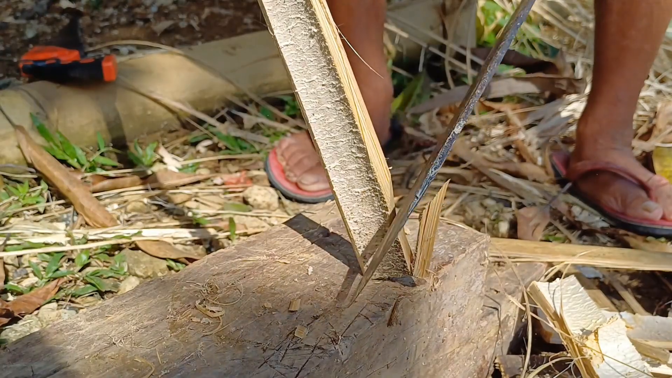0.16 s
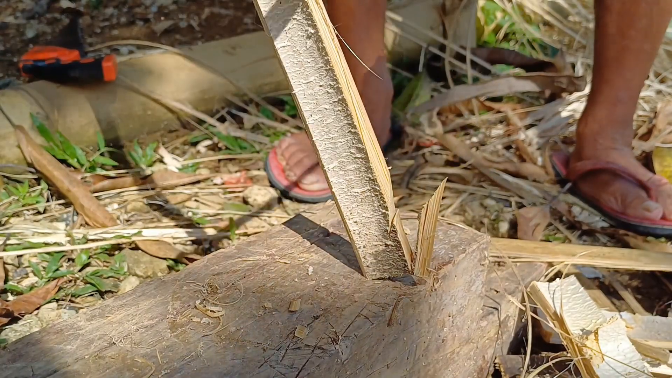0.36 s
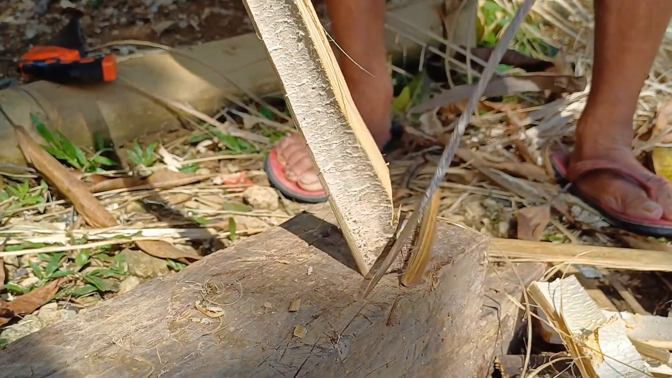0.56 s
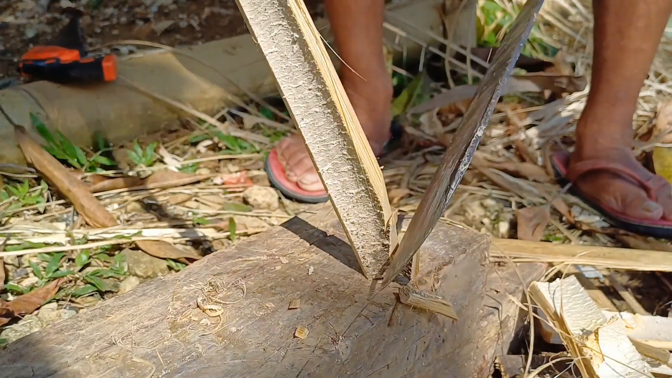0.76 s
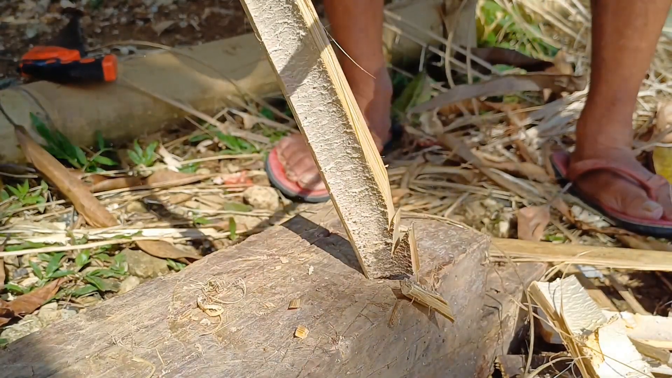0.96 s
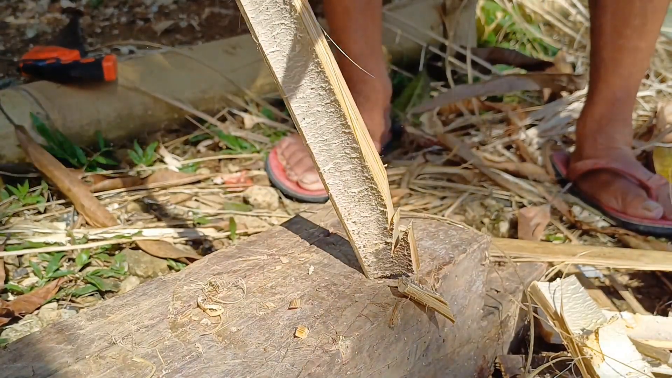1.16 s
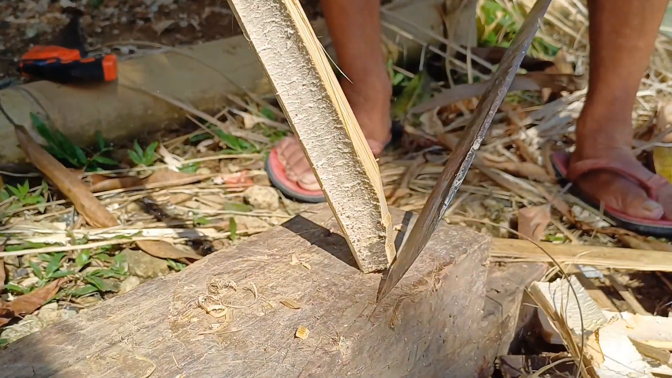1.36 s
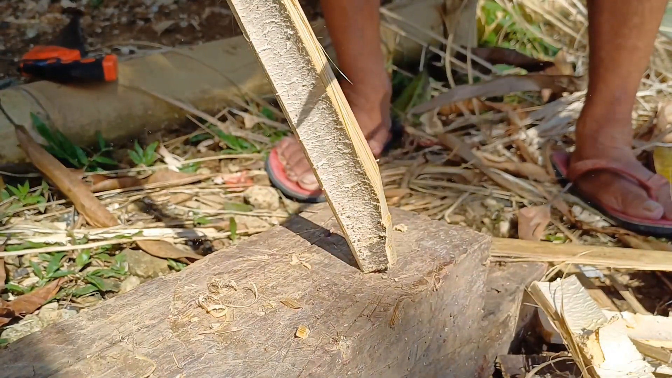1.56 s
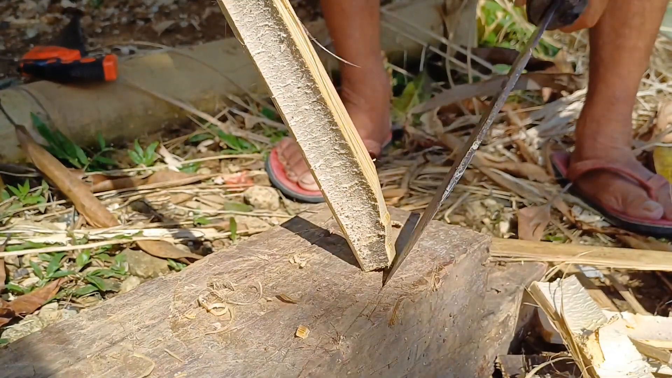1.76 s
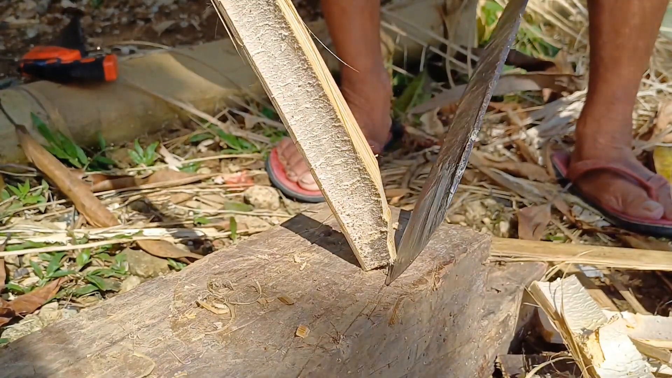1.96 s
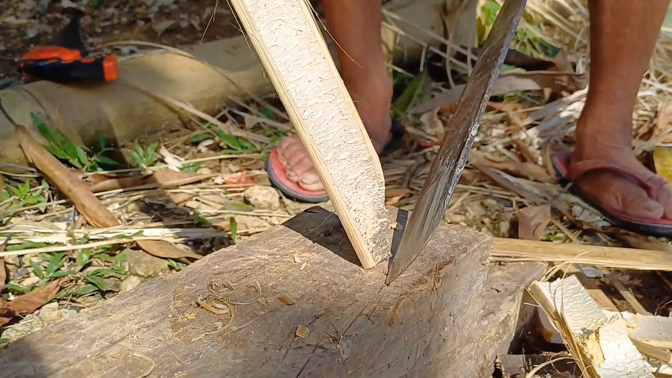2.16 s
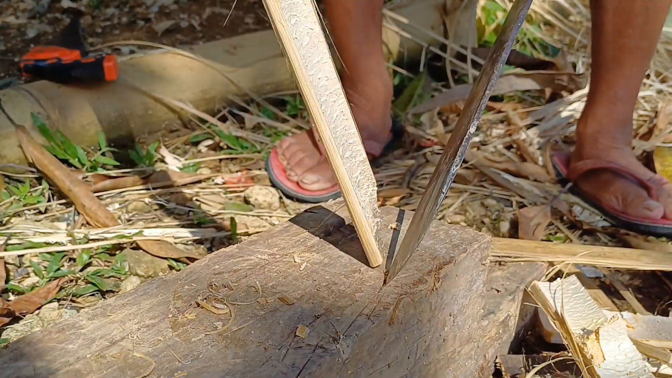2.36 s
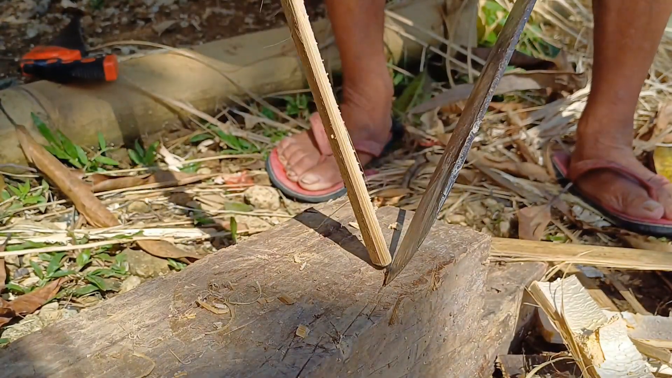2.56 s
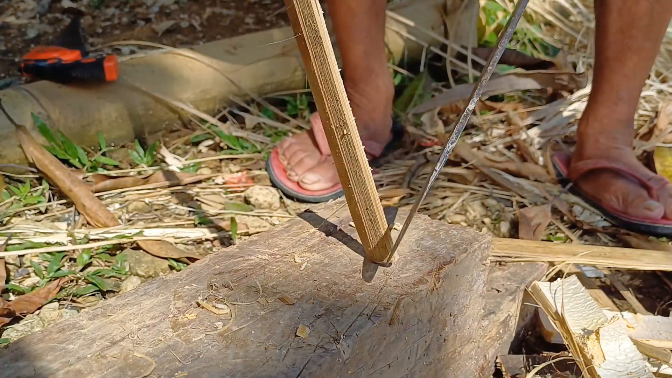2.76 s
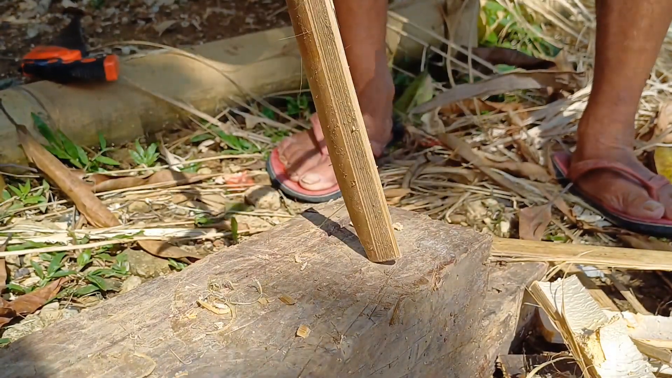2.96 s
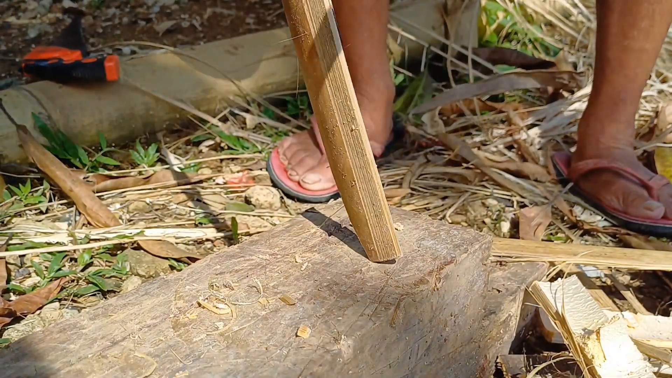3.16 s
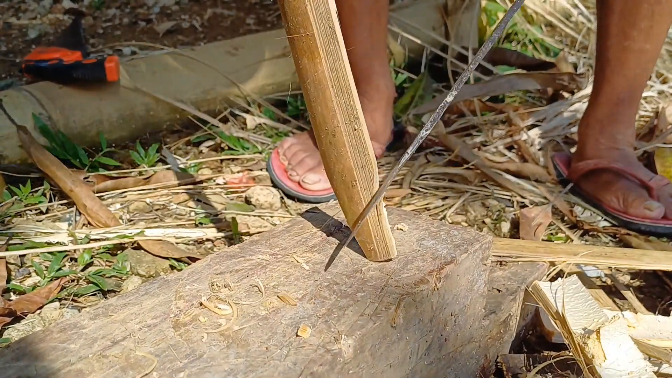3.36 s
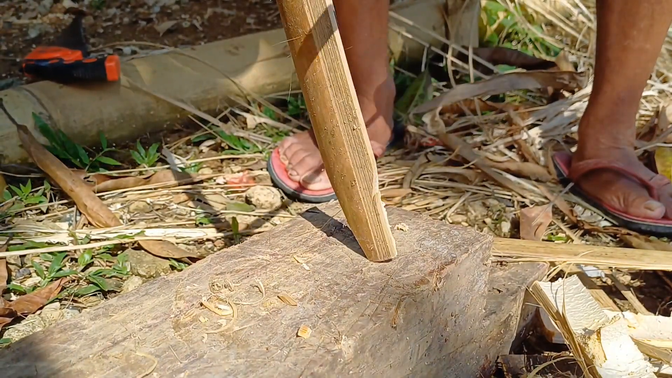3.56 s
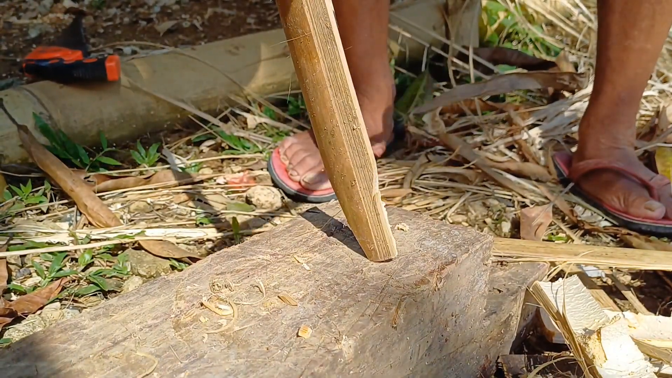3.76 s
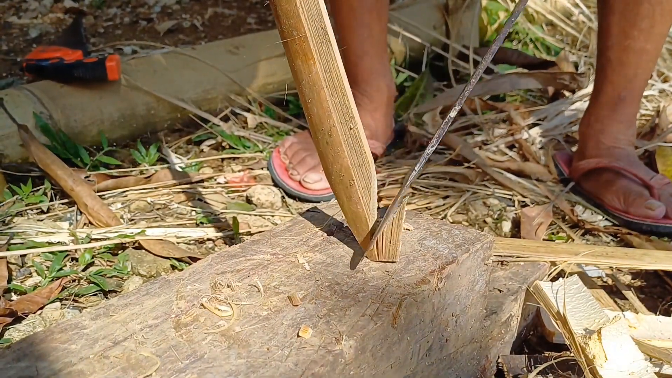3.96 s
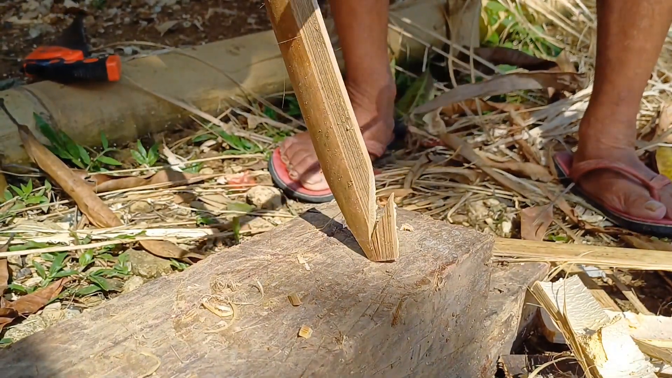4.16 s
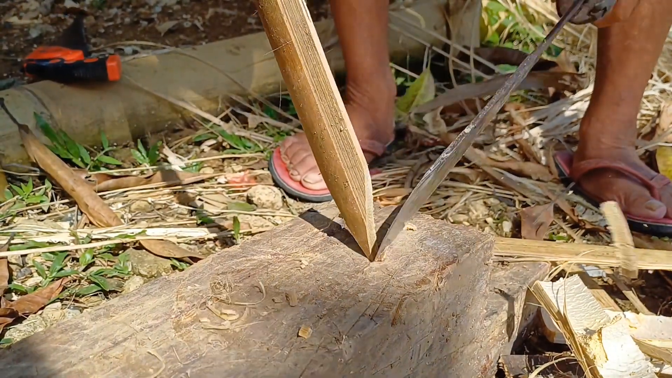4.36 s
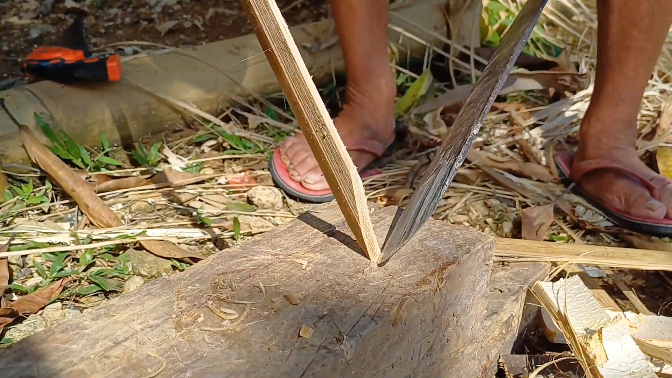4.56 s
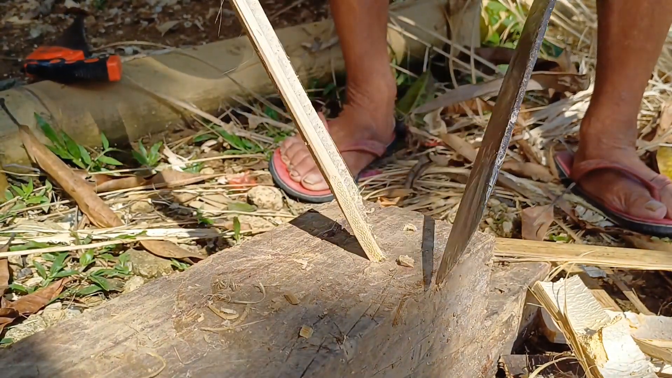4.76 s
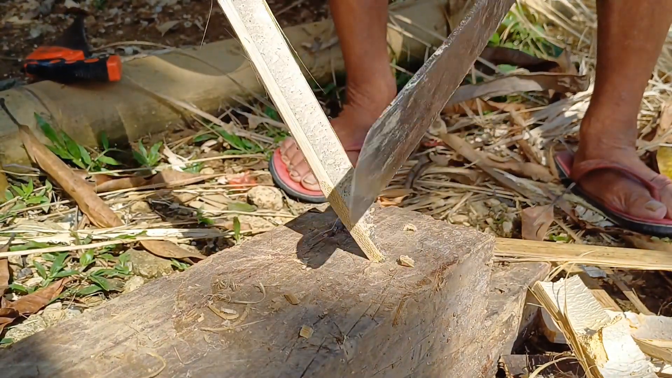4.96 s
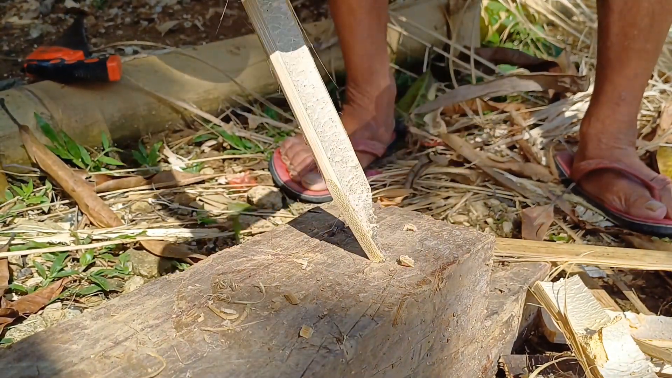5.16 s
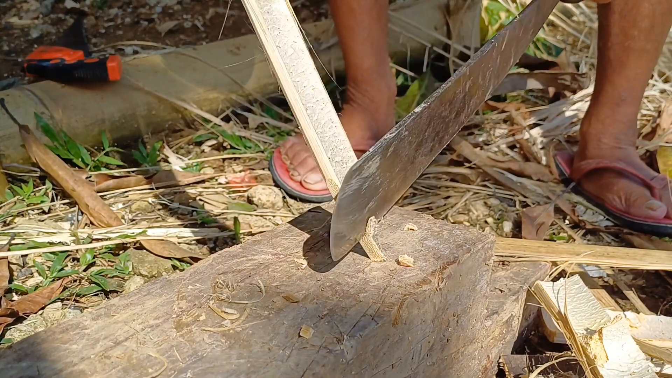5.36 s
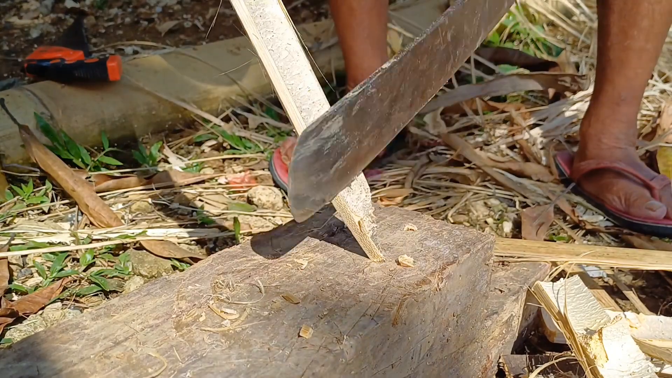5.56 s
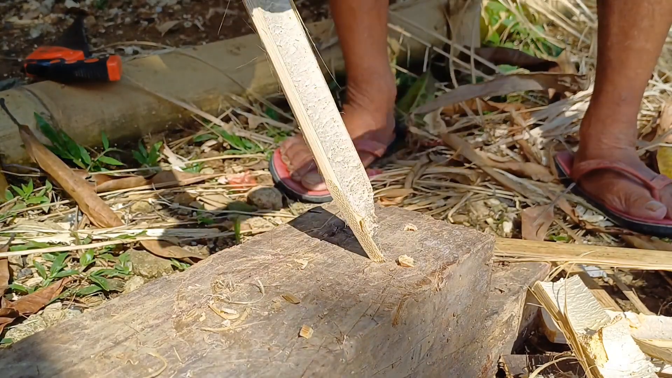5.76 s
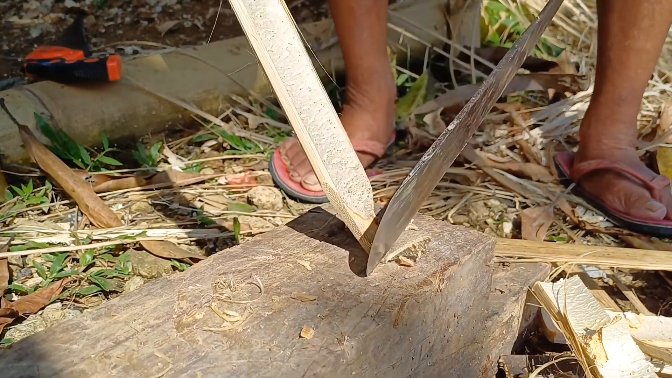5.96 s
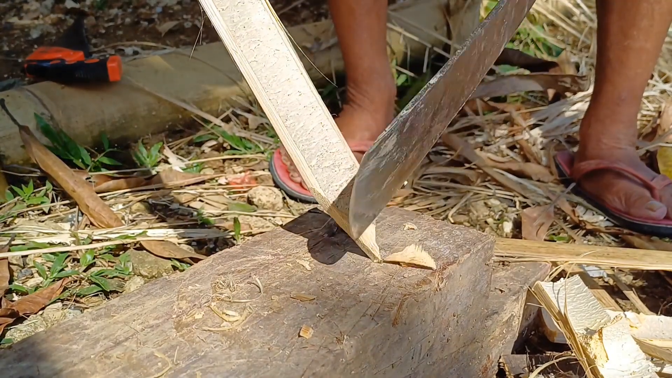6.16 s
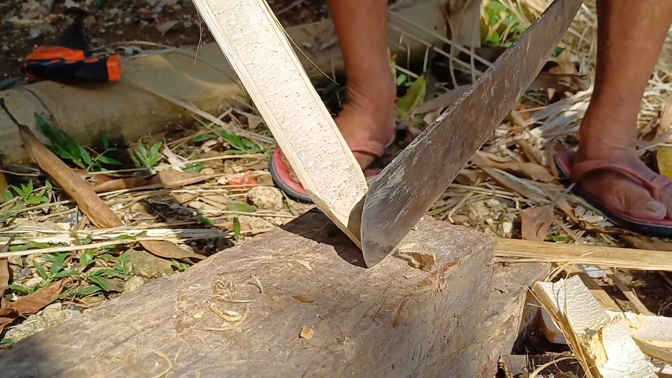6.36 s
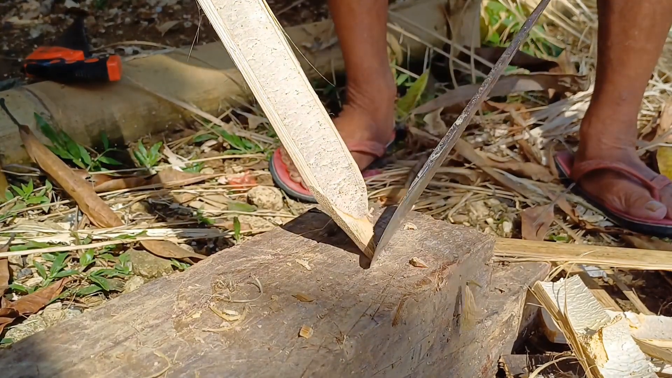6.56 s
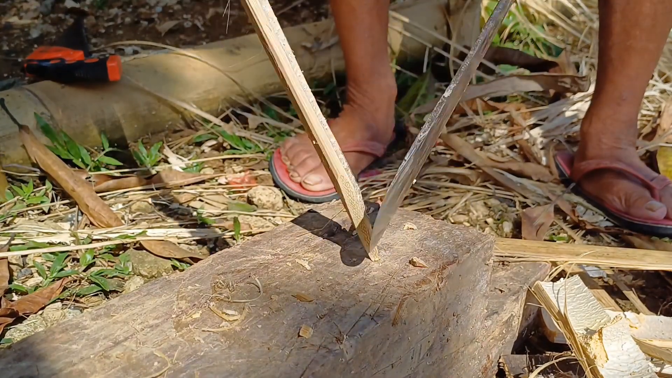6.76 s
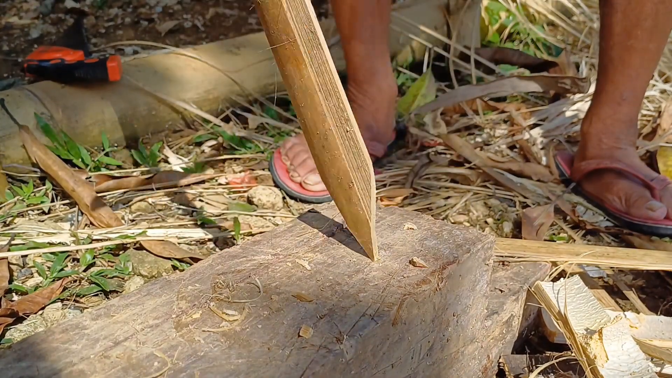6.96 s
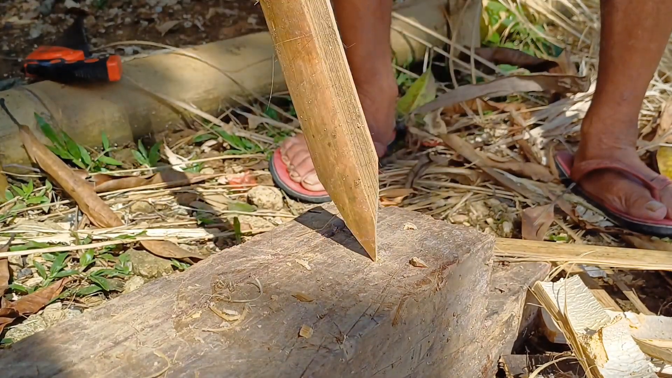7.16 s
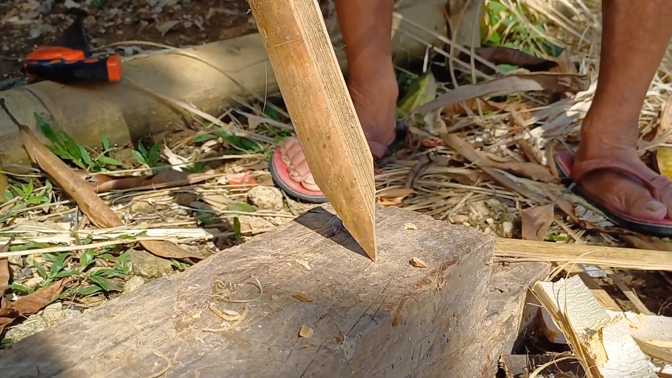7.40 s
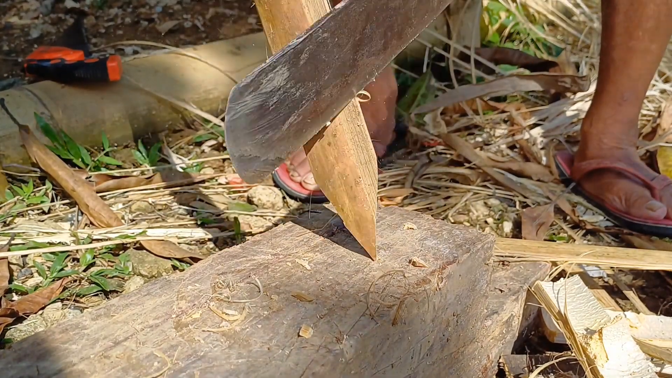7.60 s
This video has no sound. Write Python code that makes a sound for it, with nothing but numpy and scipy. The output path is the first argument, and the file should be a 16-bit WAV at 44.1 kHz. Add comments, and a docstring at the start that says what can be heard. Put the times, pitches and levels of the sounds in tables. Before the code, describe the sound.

Close stereo pickup in an open garden: a machete strikes a bamboo stake on a wooden block about every half second, with some longer gaps. Each hit is a loud dry crack with a short hollow knock, followed by small chips ticking down. A faint engine putters away at the start, birds whistle and peep far off, a nearer bird cheeps later, and a blade stroke rasps along the bamboo near the end.

```python
"""Splitting bamboo with a machete

A machete chops a split bamboo stake on a wooden block in a garden. Each blow is a burst of bright noise for
the cracking fibres plus decaying sines for ringing cane and block. Chips tick down as short noise puffs, the
stake shuffles as grainy noise, and a last stroke shaves the skin with a gritty rasp. Birds whistle as sliding
tones near and far, a small engine putters away as pulses through a pipe, and coloured noise makes the air."""
import sys
import numpy as np
from scipy import signal
from scipy.fft import rfft, irfft, next_fast_len
from scipy.io import wavfile
from scipy.ndimage import uniform_filter1d, map_coordinates

SR = 44100
rng = np.random.default_rng(int(sys.argv[2]) if len(sys.argv) > 2 else 0)


def unload_audio(sound):
    """Save the sound as a 16-bit wav file, at the path given as the first command line argument."""
    columns = np.transpose(np.atleast_2d(sound))
    # keep every value between -1 and 1, then stretch to whole-number steps
    steps = np.round(np.clip(columns, -1, 1) * 32767)
    wavfile.write(sys.argv[1], SR, steps.astype(np.int16))


N = 336483


def amp(db):
    """Gain of a level in dB."""
    return 10 ** (np.asarray(db) / 20)


def unit(x):
    """x at rms 1."""
    return x / np.sqrt(np.mean(x ** 2) + 1e-20)


def along(points, hz):
    """Read a table of (Hz, value) points on a log frequency axis."""
    point_hz, value = np.transpose(points)
    return np.interp(np.log(hz + 1), np.log(point_hz + 1), value)


def curves(rows):
    """One value per sample for each column after the time."""
    s, *columns = np.transpose(rows)
    return [np.interp(np.arange(N) / SR, s, column) for column in columns]


def gate(rows, edge_s):
    """1 while the table lasts, with soft edges."""
    t = np.arange(N) / SR
    return np.clip(np.minimum(t - rows[0][0], rows[-1][0] - t) / edge_s, 0, 1)


def wobble(rate_hz):
    """A smooth random curve through rate_hz random knots a second."""
    knots = rng.standard_normal(int(N * rate_hz / SR) + 4)
    return map_coordinates(knots, [np.arange(N) * rate_hz / SR])


def filtered(x, response):
    """x shaped by a complex response of frequency."""
    n = x.shape[-1]
    padded = next_fast_len(n + 4096)
    return irfft(rfft(x, padded) * response(np.fft.rfftfreq(padded, 1 / SR)), padded)[..., :n]


def resonance(f, centre_hz, width_hz):
    """Response of one damped mode, 1 at its centre."""
    damping = 1j * f * width_hz
    return damping / (centre_hz * centre_hz - f * f + damping)


def progress(length_s):
    """A ramp from 0 towards 1 over an event."""
    return np.arange(round(length_s * SR)) / (length_s * SR)


def add(out, s, x):
    """Mix x into out from time s."""
    part = out[..., round(s * SR):][..., :x.shape[-1]]
    part += x[..., :part.shape[-1]]


# Stereo likeness of noise: hz [Hz], likeness [-1 to 1]
STEREO_LIKENESS = [(60, .85), (130, 0.96), (290, 0.69), (640, 0.49), (1400, -0.3), (3100, -0.19),
                   (7000, -0.31), (15000, 0.81)]


def pair(two, spectrum, tilt_db=0):
    """Two noises coloured and mixed to left and right: most alike in the bass and at the very top."""
    turn = lambda hz: np.arccos(np.clip(along(STEREO_LIKENESS, hz), -1, 1)) / 2
    # the tilt is in dB per octave, pivoting at 5 kHz
    gain = lambda hz: amp(along(spectrum, hz) + tilt_db * np.log2(hz / 5000 + 1e-3))
    mid, side = filtered(two, lambda hz: gain(hz) * [np.cos(turn(hz)), np.sin(turn(hz))])
    return np.array([mid + side, mid - side])


def rush(spectrum, patchy_db):
    """Stereo noise of rms 1 with patches of random gain in time and frequency."""
    bins = signal.stft(rng.standard_normal((2, N)), nperseg=512)[2]
    field = uniform_filter1d(rng.standard_normal(bins.shape[1:]), size=6, axis=0)
    field = uniform_filter1d(field, size=10, axis=1)
    patchy = signal.istft(bins * amp(patchy_db * unit(field)), nperseg=512)[1][:, :N]
    return unit(pair(patchy, spectrum))


# Garden decay before any stretch: hz [Hz], t60_s [s]
GARDEN_DECAY = [(100, 0.51), (500, 0.12), (2000, 0.14), (6000, 0.14), (15000, 0.045)]


def echoes(x, longer=1):
    """The garden's answer: each frequency dies at its own speed, differently on each side."""
    hz, t, bins = signal.stft(rng.standard_normal((2, SR // 2)), SR, nperseg=256)
    t60_s = longer * along(GARDEN_DECAY, hz)[:, None]
    tail = signal.istft(bins * amp(-60 * t / t60_s), SR, nperseg=256)[1]
    return signal.fftconvolve(np.atleast_2d(x), tail / np.linalg.norm(tail[0]), axes=1)


# Slow level moves of the air: start_s [s], rumble_db [dB], wind_db [dB]
AIR_LEVELS = [(0.0, -58.5, -59.5), (0.55, -52.5, -60), (0.74, -55.5, -59), (1.08, -60, -63),
              (1.59, -60, -67), (1.89, -55, -60), (2.08, -55.5, -62.5), (2.59, -60, -63), (2.83, -57, -61),
              (3.91, -54, -58.5), (4.14, -60, -58.5), (4.57, -53, -60.5), (5.63, -51.5, -56.5),
              (5.74, -46.5, -48), (5.95, -50, -56), (7.01, -53.5, -61), (7.46, -48, -54), (7.63, -52, -59)]
# Relative colours of rumble, wind and leaf hiss: hz [Hz], density_db [dB per Hz]
RUMBLE_COLOUR = [(12, -52), (20, -12), (91, -11), (118, 0.5), (231, -11), (259, -29), (300, -15),
                 (390, -27), (660, -120)]
BREEZE_COLOUR = [(88, -23), (150, -2), (364, -7), (409, -8.5), (892, -30.5), (1030, -39), (1500, -33.5),
                 (1950, -69), (3300, -120)]
LEAF_COLOUR = [(600, -38.5), (900, -12), (1300, -17.5), (2200, -10), (3300, -13.5), (4400, -11),
               (7200, -11), (8000, -16.5), (9500, -29.5), (12000, -61)]
LEAVES_DB, TOP_HISS_DB = -69.5, -78


def air():
    """Far rumble, lumpy wind that brightens in gusts, and the nearly steady hiss of leaves."""
    rumble_db, wind_db = curves(AIR_LEVELS)
    rumble = amp(rumble_db + 3.3 * wobble(14)) * rush(RUMBLE_COLOUR, patchy_db=2.0)
    lumps_db = 2.4 * wobble(16)
    wind = amp(wind_db + lumps_db) * rush(BREEZE_COLOUR, patchy_db=0.0)
    # the brighter layer gains 1.1 dB per dB of wind
    gust_colour = [(400, -26.5), (650, 1.0), (1500, -13.0), (2400, -23.5)]
    gusts = amp(1.1 * (wind_db + 48.5) - 64.5 + lumps_db) * rush(gust_colour, patchy_db=1.0)
    top_colour = [(6500, -25.0), (8200, -6), (11400, 1.5), (11900, -4.0), (16500, -10)]
    top = amp(TOP_HISS_DB) * rush(top_colour, patchy_db=1.2)
    leaves = amp(LEAVES_DB + 0.33 * wobble(4.1)) * rush(LEAF_COLOUR, patchy_db=3.4)
    return rumble + wind + gusts + top + leaves


# Engine run, level before echo and panning: start_s [s], firing_rate_hz [firings per s], level_db [dB]
ENGINE_RUN = [(0, 31.7, -58), (.2, 31.7, -56.5), (.5, 31.7, -55), (.9, 31.5, -57), (1.2, 31, -58.5),
              (1.7, 30, -68)]
# Exhaust pipe resonances: centre_hz [Hz], width_hz [Hz], gain_db [dB]
EXHAUST_PIPE = [(140, 43, 0), (227, 23, 2.5), (340, 80, -0.5), (427, 96, -3.5), (780, 120, -23)]


def engine():
    """One puff per firing excites the exhaust pipe's resonances."""
    rate_hz, level_db = curves(ENGINE_RUN)
    cycles = np.cumsum(rate_hz) / SR + .22
    fired = np.diff(np.floor(cycles), prepend=0) * amp(1.5 * wobble(30))

    def pipe(f):
        modes = enumerate(EXHAUST_PIPE)
        body = sum((-1) ** k * amp(db) * resonance(f, centre, width) for k, (centre, width, db) in modes)
        return body / (1 + 1j * f / 500) ** 2  # two gentle lowpasses at 500 Hz

    puffs = amp(level_db) * gate(ENGINE_RUN, .01) * unit(filtered(fired, pipe))
    return puffs + amp(-8) * echoes(puffs)[:, :N]


# Far whistles and coos, level before the mix: start_s [s], length_s [s], from_hz [Hz], to_hz [Hz], level_db [dB]
FAR_WHISTLES = [(1.905, 0.1126, 536, 421, -68.5), (2.546, .38, 2688, 1492, -68.5),
                (2.765, .16, 3720, 4000, -85), (2.99, 0.073, 2610, 2490, -74.5),
                (2.995, 0.095, 3640, 3270, -81), (3.56, .22, 2025, 1597, -78), (4.02, .17, 2410, 2820, -76),
                (5.16, 0.12, 1440, 900, -71), (5.994, 0.1, 905, 1157, -73), (6.06, 0.089, 1390, 2205, -79),
                (6.09, .12, 906, 1227, -74), (6.455, 0.084, 970, 1067, -74), (6.58, 0.062, 1220, 1154, -79),
                (6.698, 0.044, 924, 860, -70.5), (7.032, 0.0576, 890, 848, -73),
                (7.5, 0.13, 2100, 1543, -70)]
# One far bird's repeated note, level before the mix: start_s [s], level_db [dB]
REPEATED_PEEPS = [(0.072, -80), (0.275, -77.5), (0.496, -72.5), (0.736, -75.5), (0.984, -77.5),
                  (2.354, -85), (2.536, -74.5), (2.804, -78.5), (3.031, -74), (3.259, -72.5), (3.493, -74),
                  (4.095, -83.5), (6.147, -74.5), (6.436, -78), (6.686, -74.5), (6.951, -89)]
PEEP_S, PEEP_FROM_HZ, PEEP_TO_HZ = 0.13, 2940, 2640


def far_birds():
    """Sliding sine whistles with a slight quaver in pitch, heard mostly as echo."""
    whistles = np.zeros(N)
    quaver = 1 + .009 * wobble(150)
    peeps = [(s, PEEP_S, PEEP_FROM_HZ, PEEP_TO_HZ, db) for s, db in REPEATED_PEEPS]
    for s, length_s, from_hz, to_hz, level_db in list(FAR_WHISTLES) + peeps:
        u = progress(length_s)
        glide_hz = from_hz * (to_hz / from_hz) ** (1 - (1 - u) ** 1.1)
        hz = glide_hz * np.roll(quaver, -round(s * SR))[:len(u)]
        tone = np.sin(2 * np.pi * np.cumsum(hz) / SR)
        add(whistles, s, amp(level_db) * np.sin(np.pi * u) ** .5 * tone)
    brightened = filtered(whistles, lambda hz: amp(along([(900, -5.5), (2500, -0.5)], hz)))
    return amp(1.5) * whistles + amp(11) * echoes(brightened, longer=4.3)[:, :N]


# Hoarse far chatter: start_s [s], length_s [s], level_db [dB before the fade]
HOARSE_CHATTER = [(2.76, 0.21, -66), (2.974, 0.21, -65.5), (3.944, 0.28, -57.5)]


def hoarse_bird():
    """Bursts of mid-treble noise that start quickly and fade."""
    swell = np.zeros(N)
    for s, length_s, level_db in HOARSE_CHATTER:
        u = progress(length_s)
        add(swell, s, amp(level_db) * np.minimum(u / .12, 1) * (1 - u) ** .6)
    return swell * rush([(1400, -18), (2000, -10.5), (2700, -5), (3900, -12), (4500, -36)], patchy_db=4.5)


# Near cheeps: start_s [s], steady_s [s], from_hz [Hz], level_db [dB before the mix], halfway_share [0-1]
NEAR_CHEEPS = [(4.732, 0.035, 1580, -55.5, 0.04), (4.913, 0.015, 1661, -50, .22),
               (5.097, 0.016, 1660, -48, 0.27), (5.312, 0.015, 1672, -49, 0.7),
               (5.507, .02, 1651, -46, 0.7), (5.719, .025, 1599, -47, 0.7)]
# The bird's throat colour: hz [Hz], gain_db [dB]
THROAT_COLOUR = [(1500, -9), (2250, -40), (2650, -1), (3100, 0), (3900, -4), (4800, -9), (5600, -28),
                 (6500, -7), (7300, -11), (8000, -19), (10000, -36)]
FALL_S, FALL_TO_HZ = 0.069, 1324  # each cheep ends in a slide to this pitch


def near_bird():
    """Stacks of partials that soon split, as lines halfway between the harmonics fade in."""
    near = np.zeros(N)
    rough = 1 + .006 * wobble(200)
    for s, steady_s, from_hz, level_db, halfway_share in NEAR_CHEEPS:
        length_s = steady_s + FALL_S
        t = np.arange(round(length_s * SR)) / SR
        hz = np.interp(t, [steady_s, length_s], [from_hz, FALL_TO_HZ]) * rough[round(s * SR):][:len(t)]
        halfway = np.clip(halfway_share, 0, 1) * np.clip((t - .022) / 0.013, 0, 1)
        half_phase = np.pi * np.cumsum(hz) / SR
        stack = np.zeros(len(t))
        for k in range(2, 13):  # odd k are the halfway lines
            share = halfway if k % 2 else 1
            stack += share * amp(along(THROAT_COLOUR, hz * k / 2)) * np.sin(k * half_phase)
        envelope = np.clip(np.minimum(t / 0.018, (length_s - t) / 0.056), 0, 1)
        add(near, s, amp(level_db) * envelope * stack)
    foliage = [(1500, -9), (2800, 1.5), (4500, -8), (8000, -7.5)]  # foliage returns the middle best
    dulled = filtered(near, lambda hz: amp(along(foliage, hz)))
    return near * amp([[-5.5], [-3.5]]) + amp(9.5) * echoes(dulled, longer=2.9)[:, :N]


# Stake shuffled on the block: start_s [s], length_s [s], level_db [dB before the fade], top_hz [Hz]
STAKE_SHUFFLES = [(1.893, 0.18, -53, 798), (2.773, 0.2, -58.5, 878), (3.621, 0.13, -52.5, 1500),
                  (3.939, .16, -52.5, 698), (5.607, 0.34, -55, 780)]


def shuffles():
    """A dull, grainy rustle that starts quickly and fades."""
    out = np.zeros((2, N))
    for s, length_s, level_db, top_hz in STAKE_SHUFFLES:
        u = progress(length_s)
        grains = rng.standard_normal((2, len(u))) * amp(2.0 * wobble(170)[:len(u)])
        colour = [(150, -20), (330, 0), (top_hz * 0.73, -6), (top_hz, -12), (top_hz * 2.0, -35), (6000, -90)]
        envelope = np.minimum(u / 0.11, 1) * (1 - u) ** .8
        add(out, s, amp(level_db) * envelope * unit(pair(grains, colour)))
    return out


# Chips landing: start_s [s], tick_peak_db [dB before panning], pitch_hz [Hz], tap_db [dB relative to the tick]
CHIP_LANDINGS = [(0.7628, -56, 5600, 13.5), (1.265, -31, 7420, -15), (1.279, -32, 5300, -26),
                 (1.3518, -30, 4160, -22), (1.3727, -37, 4300, -13), (1.3953, -38, 6750, -4),
                 (1.404, -39, 5950, -19), (1.4311, -40, 11540, -7), (1.4517, -44.5, 6480, -24),
                 (1.4735, -36, 3950, -9), (1.616, -47, 6100, -26), (1.8713, -38, 11130, 0),
                 (1.9028, -38, 7400, -15), (1.914, -47.5, 6670, 3), (2.1036, -47, 6840, -30),
                 (2.354, -46, 9670, -33.5), (2.3844, -49, 6720, -14.5), (3.3069, -39, 4540, 5.5),
                 (3.3725, -35, 6570, -2), (3.4458, -36, 6850, -3.5), (3.479, -50, 11050, -30),
                 (3.512, -46.5, 5235, -3.5), (4.488, -35.5, 6030, -33), (4.5246, -31, 12500, -11.5),
                 (6.0307, -49, 5070, -8), (6.14, -55, 7000, 8), (6.6114, -45.5, 7380, -21)]
CHIP_T60_S = 0.015
CRUMB_DB, CRUMB_HZ, CRUMB_TAP_DB = -55.5, 5500, -10.5  # centres of level and pitch; tap relative to tick


def chips():
    """Each chip or crumb gives a short dry tick around its pitch, with a duller tap under it."""
    out, t = np.zeros((2, N)), np.arange(SR // 20) / SR
    landings = list(CHIP_LANDINGS)
    for when, size, pitch in rng.random((2 * N // SR, 3)):  # crumbs scattered at random, about two a second
        crumb_db, crumb_hz = CRUMB_DB + 6 * (size - .5), CRUMB_HZ * (.7 + .6 * pitch)
        landings.append((when * N / SR, crumb_db, crumb_hz, CRUMB_TAP_DB))
    for s, tick_db, hz, tap_db in landings:
        puffs = rng.standard_normal((2, 2, len(t))) * amp(-60 * t / CHIP_T60_S)
        tick = pair(puffs[0], [(1500, -30), (hz * 0.5, -9), (hz, 0), (hz * 1.3, -8), (21000, -16)])
        tap = pair(puffs[1], [(500, -30.5), (900, 8.5), (2600, 13.5), (4000, 4)])
        both = amp(tick_db) * (tick / abs(tick).max() + amp(tap_db) * tap / abs(tap).max())
        add(out, s, both * amp([[-1], [1]]))  # slightly to the right
        add(out, s + 0.0027, amp(-7.0) * echoes(both))
    return out


# Touch, bite, push, blade off, peel trailing away: start_s [s], rasp_db [dB before grit]
SHAVE_STROKE = [(7.222, -70), (7.228, -39.5), (7.265, -41.5), (7.271, -31), (7.34, -28), (7.396, -23),
                (7.412, -26), (7.424, -39), (7.49, -42), (7.565, -58), (7.63, -69)]
# Relative colour of the scraped skin: hz [Hz], density_db [dB per Hz]
SKIN_COLOUR = [(880, -38), (1500, -19), (1970, -40), (2130, -13.5), (3550, -9.5), (5750, -0.5), (8260, -8),
               (14300, -8.5), (16000, -22), (16500, -25)]
# Bands in which the steel sings along: centre_hz [Hz], width_hz [Hz], unused_db [dB, not played]
BLADE_BANDS = [(5570, 75, 0), (7300, 41, -1), (7560, 160, -1), (8800, 67, -2), (11300, 46, -1),
               (12500, 36, -2), (12900, 110, -3), (14400, 50, 0)]
# Modes of cane and block, also rung by the chops: pitch_hz [Hz], level_db [dB, relative], t60_s [s, nominal]
WOOD_MODES = [(67.3, -5, 0.25), (109.5, 5, 0.076), (178, 0, 0.053), (288, 1, 0.028), (395, -2, 0.036),
              (590, -1, 0.03), (765, -7, 0.031), (1002, -9.5, 0.025), (1206, 1, 0.014), (1487, -0.5, 0.028),
              (1733, -2.5, 0.036), (2220, -17, 0.011)]
SING_DB = 3.5  # lift at the centre of each blade band, more where bands overlap
SHAKE_DB, SHAKE_GROWS = -47, 0.41  # cane level at a rasp of -27 dB; dB per dB of rasp
SQUEAK_S, SQUEAK_HALF_S, SQUEAK_HZ, SQUEAK_DB = 7.345, 0.02, 1410, -41.5


def shave():
    """The blade rasps along the skin: gritty, patchy noise, part of it shaking the cane's modes."""
    rasp_db, = curves(SHAVE_STROKE)
    grit = amp(1.8 * wobble(700) + 1.3 * wobble(70))
    cane = lambda f: sum(amp(db) * resonance(f, centre, 150) for centre, db, _ in WOOD_MODES[3:])
    wood = unit(filtered(pair(rng.standard_normal((2, N)), [(100, 0)]), cane))
    shaken = amp(SHAKE_DB + SHAKE_GROWS * (rasp_db + 27)) * wood
    t = np.arange(N) / SR
    slip = np.sin(2 * np.pi * np.cumsum(SQUEAK_HZ + 60 * wobble(60)) / SR)  # a brief stick-slip
    squeak = amp(SQUEAK_DB) * np.exp(-((t - SQUEAK_S) / SQUEAK_HALF_S) ** 2) * slip
    steel = lambda f: amp(SING_DB * sum(1 / (1 + (2 * (f - c) / w) ** 2) for c, w, _ in BLADE_BANDS))
    rasp = unit(filtered(rush(SKIN_COLOUR, patchy_db=4), steel))
    return squeak + gate(SHAVE_STROKE, .002) * grit * (amp(rasp_db) * rasp + shaken)


# Blows, levels before panning: start_s [s], crack_db, thump_db, block_db, cane_db, cane_top_db [dB], cut_ms [ms],
# land_ms [ms until the blade lands], crack_t60_ms [ms], tilt_db [dB per octave],
# ring_freedom [factor on wood decay above 900 Hz]
CHOP_BLOWS = [(0.5502, -6.5, -26, -17.5, -22, -24, 3.9, 3.37, 21.6, 4, 1.57),
              (1.1773, -8.5, -21.5, -11, -7.5, -30.5, 6.1, 9.15, 18, 2, 1.38),
              (1.2064, -51.5, -43.5, -31, -36, -49, 2.8, 1.5, 18, -0.9, 1.1),
              (1.7332, -13.5, -23.5, -14, -9.5, -28, 5, 5.3, 19.7, -0.5, 2.8),
              (1.761, -44, -49.5, -25.5, -22, -44, 2.5, 2, 16, -6, 1.6),
              (3.1866, -15, -27.5, -27.5, -20.5, -23, 3.86, 4.47, 41, 2, 1.25),
              (3.622, -64.5, -46.5, -43, -59.5, -58.5, 2.4, 4.2, 40, -1, 0.56),
              (3.8014, -11.5, -31, -19.5, -25, -30, 8.8, 5.05, 12.6, 3.5, 0.62),
              (4.3153, -11, -24.5, -13, -9.5, -13, 8.8, 7.04, 9.1, 3, 1.2),
              (4.344, -54, -47, -30.5, -41.5, -43.5, 2.7, 1.5, 20, 0.5, 0.88),
              (5.2924, -12, -34.5, -38.5, -35, -31, 4.1, 6.3, 27.7, 4.5, 0.64),
              (5.8284, -11, -30, -12.5, -6.5, -16, 3.5, 10.2, 46, 2.5, 1),
              (6.3333, -18.5, -31.5, -22.5, -16, -30, 7.3, 4.3, 28, -0.9, 1.26),
              (7.396, -25.5, -39.5, -37.5, -51, -30.5, 2.6, 4.04, 150, 2.54, .8)]
# Relative colour of cracking fibres: hz [Hz], density_db [dB per Hz]
FIBRE_COLOUR = [(150, -33), (250, 0.5), (454, 3.5), (809, -3), (1190, -1), (1840, -12.5), (2160, -6),
                (3230, -10.5), (6520, -10.5), (8930, -17.5), (14900, -17.5), (16500, -22)]
# Stereo lean of a blow: hz [Hz], left_minus_right_db [dB]
BLOW_LEAN = [(60, -4.5), (200, -2), (400, -4.5), (700, -4.5), (1300, 2), (4400, 1), (15000, -3)]
RING_RISE_S = 0.00055  # time constant of the wood's onset
UNEVEN_DB = 2.5  # spread of each blow's own colour
ECHO_DB, SPLIT_DB = -13.5, -32.5  # walls under a blow; the running split under the crack


def wood_ring(t, levels_db, land_ms, freedom):
    """Decaying sines for block and cane, struck weakly at first contact and fully at the landing."""
    ring = np.zeros(len(t))
    for hz, mode_db, t60_s in WOOD_MODES:
        level_db = levels_db[np.searchsorted([200, 900, 1350], hz)]  # thump, block, cane, cane top
        t60_s = t60_s * freedom if hz > 900 else t60_s
        for start_ms, share_db in ((0, -15), (land_ms, 0)):
            u = np.maximum(t * 1000 - start_ms, 0) / 1000
            swing = np.sin(2 * np.pi * hz * (1 + rng.normal(0, .012)) * u)
            decay_db = level_db + mode_db + share_db + rng.normal(0, 1.4) - 60 * u / t60_s
            ring += rng.choice([-1, 1]) * amp(decay_db) * swing * (1 - np.exp(-u / RING_RISE_S))
    return ring


def lean(hz):
    """Level lean by frequency, with the left 0.1 ms ahead of the right."""
    early = np.exp(2j * np.pi * hz * 5e-5 * np.array([[1], [-1]]))
    return amp(along(BLOW_LEAN, hz) * [[.5], [-.5]]) * early


def chops():
    """The crackle swells while the blade cuts; when it lands, block and cane ring."""
    out, t = np.zeros((2, N)), np.arange(SR // 4) / SR
    ms = t * 1000
    split_colour = [(700, -31), (1500, -7.0), (3200, -6.0), (5500, -3.0), (7500, -7.5), (16500, -9.5)]
    for s, crack_db, *levels_db, cut_ms, land_ms, t60_ms, tilt_db, freedom in CHOP_BLOWS:
        swell = np.minimum(ms / cut_ms, 1)
        shape = swell ** 1.3 * amp(-60 * np.maximum(ms - cut_ms, 0) / t60_ms)
        bursts = amp(3.6 * rng.standard_normal(len(t) // 16 + 1)).repeat(16)[:len(t)]  # fibres break in bursts
        snaps = rng.standard_normal((2, len(t))) * bursts
        bumps = np.c_[np.geomspace(1500, 17000, 40), UNEVEN_DB * rng.standard_normal(40)]
        fibres = filtered(pair(snaps, FIBRE_COLOUR, tilt_db), lambda hz: amp(along(bumps, hz)))
        crack = amp(crack_db) * shape * unit(fibres)
        ring = wood_ring(t, levels_db, land_ms, freedom)
        add(out, s, filtered(crack + ring, lean))
        split = unit(pair(snaps[:, ::-1], split_colour))
        fading = amp(-120 * t) / (1 + np.exp((ms - 95) / 8))  # the split runs on along the grain, then stops
        add(out, s, amp(crack_db + SPLIT_DB) * fading * swell * split)
        blow = crack + ring * amp(-8.0)  # the ring is aimed less at the walls than the crack
        walls = echoes(blow) + amp(-9.5) * echoes(blow, longer=3.2)  # near and far walls
        add(out, s + .004, amp(ECHO_DB) * walls)
    return out


def scene():
    """All sources at the two microphone ports, engine and air slightly to the right."""
    background = (air() + engine()) * amp([[-.6], [.6]])
    birds = far_birds() + hoarse_bird() + near_bird()
    return background + birds + shuffles() + chips() + shave() + chops()


TOP_HZ = 15900  # the band limit starts to fall here


def record(dry):
    """The microphones lose the deepest bass, the loudest peaks round off, and the top falls away steeply."""
    heard = signal.sosfilt(signal.butter(3, 50, "high", fs=SR, output="sos"), dry)
    heard = heard / (1 + abs(heard / .95) ** 4) ** (1 / 4)
    return filtered(heard, lambda hz: amp(-60 * np.clip((hz - TOP_HZ) / 900, 0, 2)))


dry = scene()
out = record(dry)
unload_audio(out)
```